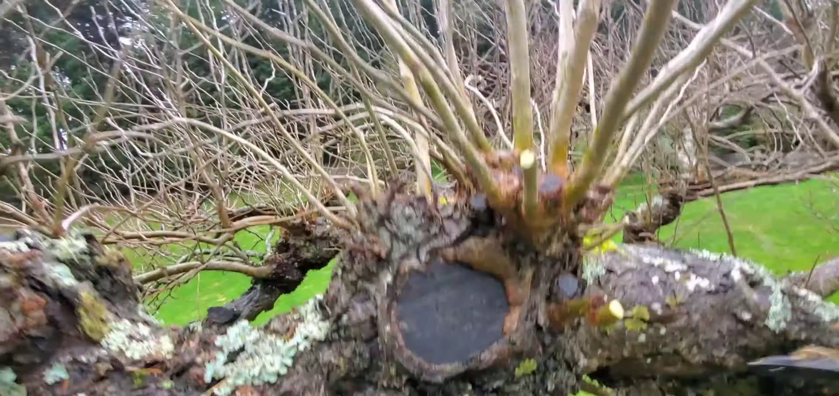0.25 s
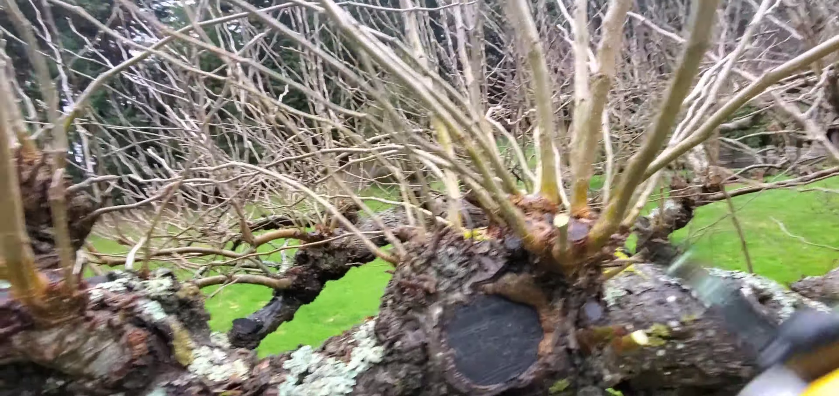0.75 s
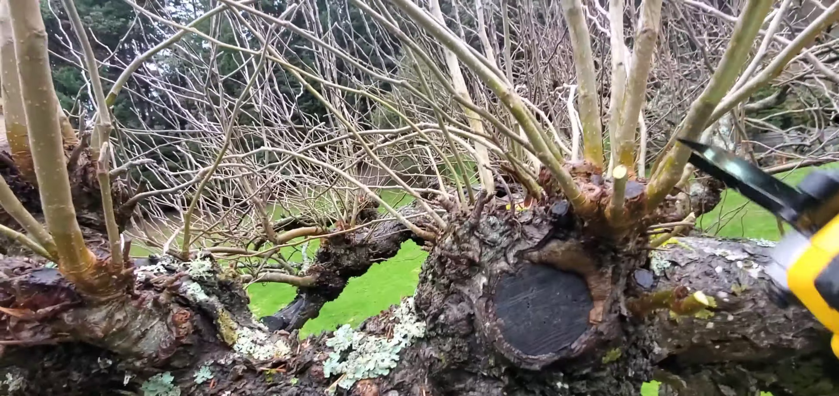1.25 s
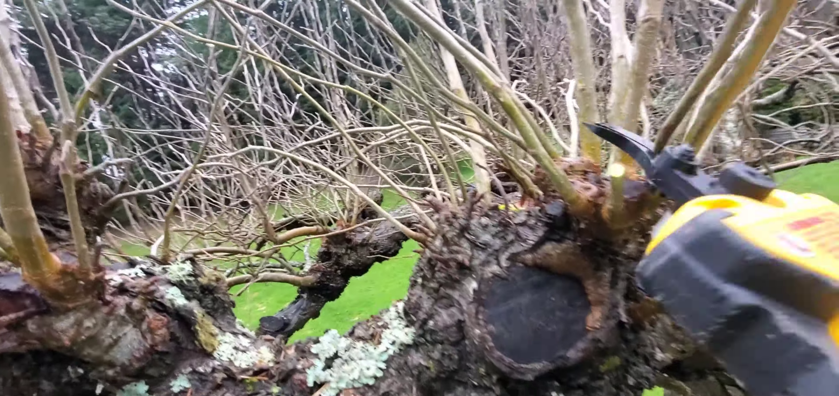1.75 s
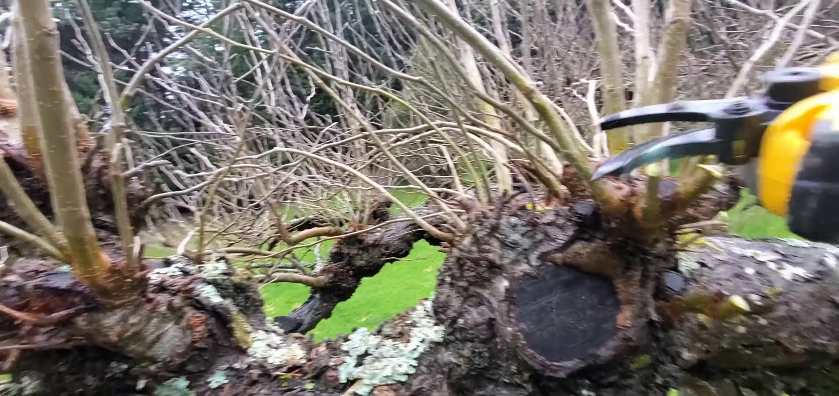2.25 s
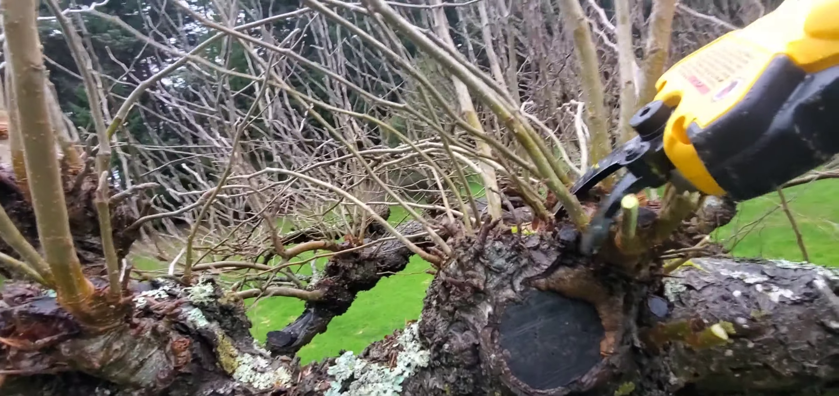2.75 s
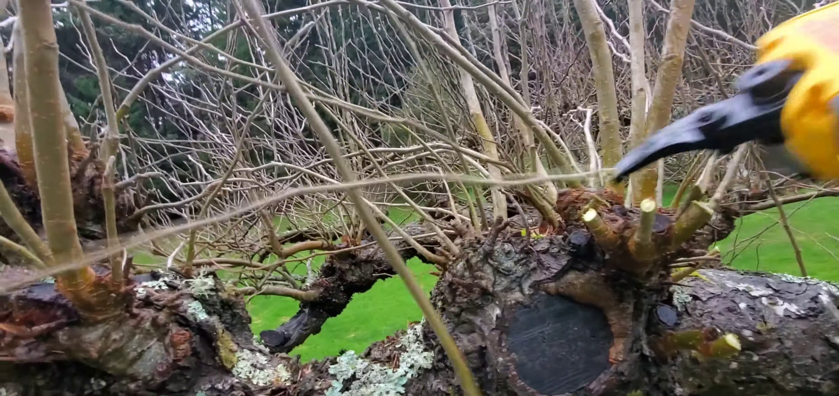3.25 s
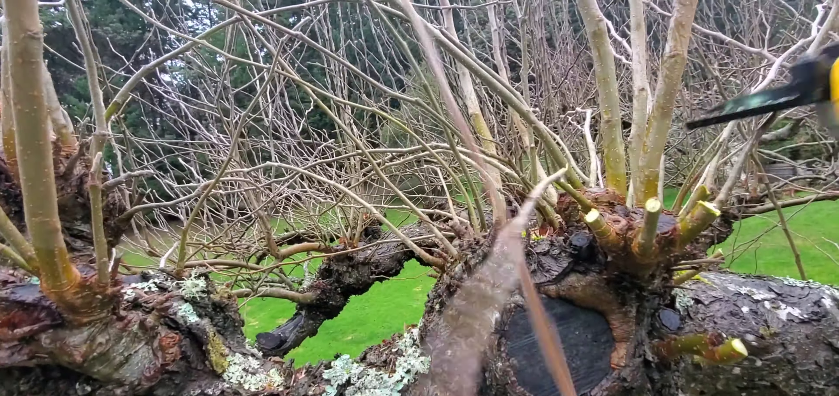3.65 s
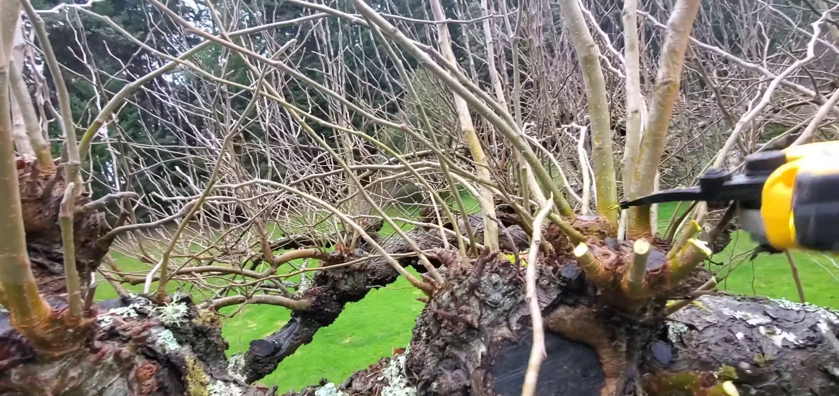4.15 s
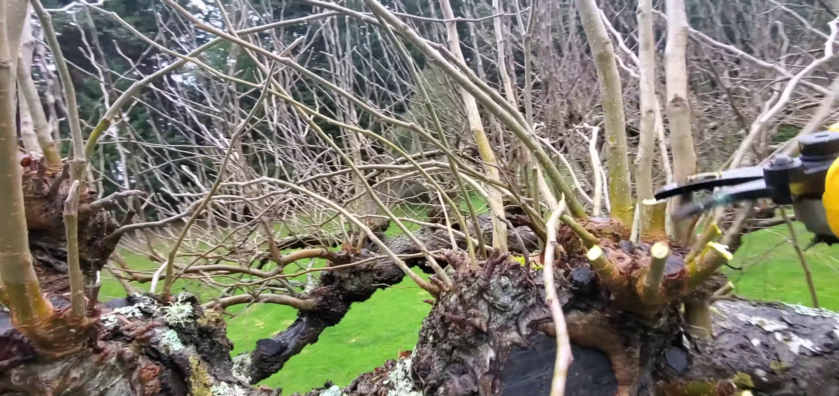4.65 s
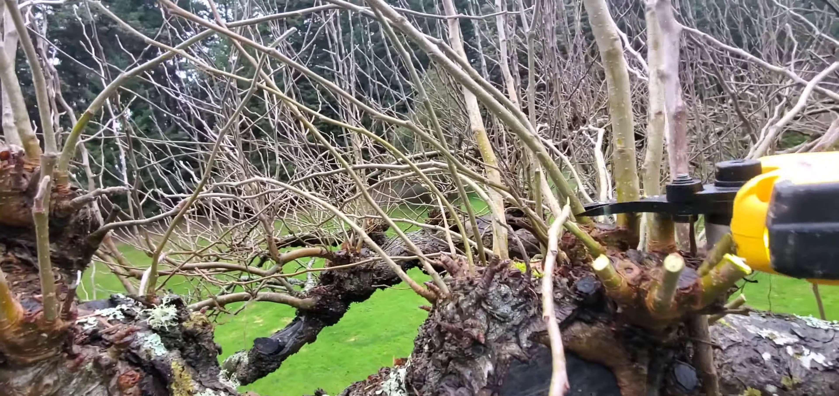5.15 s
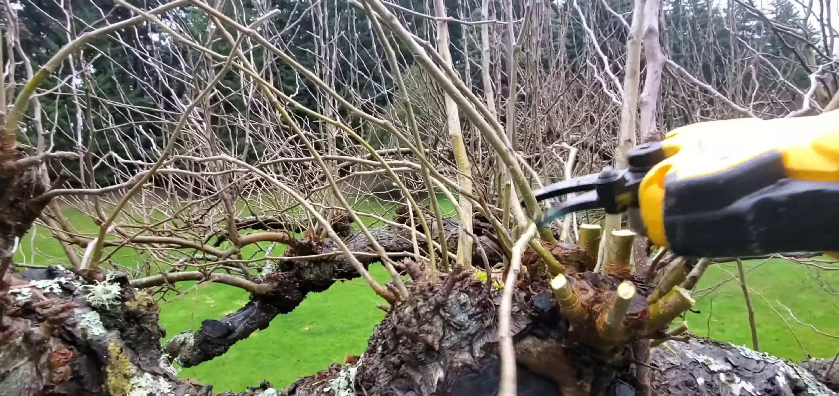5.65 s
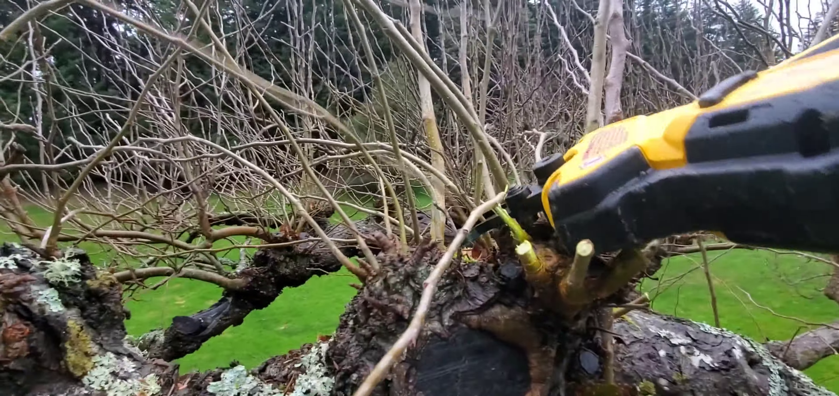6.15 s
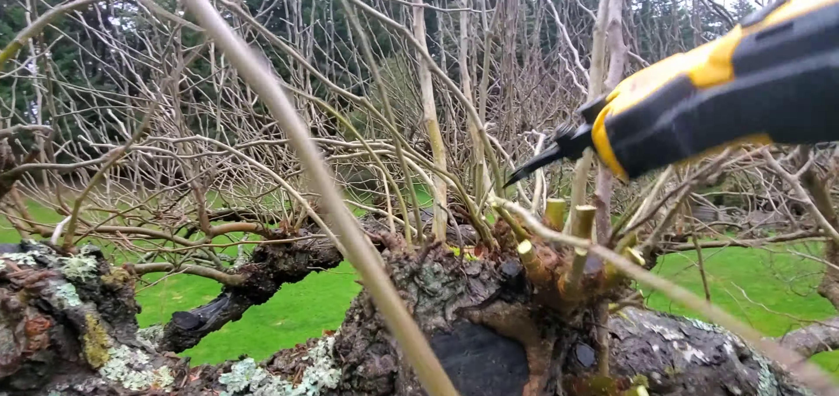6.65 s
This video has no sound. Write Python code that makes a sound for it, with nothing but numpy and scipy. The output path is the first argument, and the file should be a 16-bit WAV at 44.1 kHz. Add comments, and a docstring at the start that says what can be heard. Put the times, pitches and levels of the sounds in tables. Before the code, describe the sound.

Outdoors, low wind thumps hit the left microphone at 0-0.3 s, then both sides strongly from 0.5 to 1 s, over thin leaf hiss and a few faint ticks. At 1.64 s battery pruning shears start on the right: a gritty motor and gear whir with a quick upward whoop strains shut for about 0.27 s, knocks around 1.87 s, then a lighter, lower whir reopens them at 2.0-2.35 s, ending in a hard clack. The close-and-reopen pair repeats at 2.8 and 3.3, 4.05 and 4.5, 5.1 and 5.5, and 6.15 and 6.55 s, with sharp knocks, strongest near 3.06 and 5.32 s. Dry twig ticks cluster around 3.2 and 5.9 s; dull handling bumps come near 1.4, 3.8 and 6.0 s. A barely audible hum swells at 4.3 s. Wind rumbles unevenly to the end, with the tool duller on the left.

```python
"""Wind thumps on the left microphone port, then on both, in an orchard; battery pruning shears follow on the right.
They close and reopen five times: motor and gears whir from noise repeated partly on each turn plus shaft tones,
whoops glide as the speed changes, and decaying modes with bursts of noise make the knocks and a twig's snap.
The left port, farther off, hears the tool about half a millisecond later and duller. Around it come short ticks,
dull bumps, a faint two-tone hum and the hiss of leaves; wind is shaped noise with levels of its own on each port."""
import sys
import numpy as np
from scipy import signal
from scipy.fft import rfft, irfft, next_fast_len
from scipy.io import wavfile
from scipy.ndimage import uniform_filter1d, map_coordinates

SR = 44100
rng = np.random.default_rng(int(sys.argv[2]) if len(sys.argv) > 2 else 0)


def to_wav(s):
    """Save 16-bit WAV."""
    ch = np.atleast_2d(s).T  # columns
    pcm = np.round(np.clip(ch, -1, 1) * 32767)  # PCM
    wavfile.write(sys.argv[1], SR, pcm.astype(np.int16))


N = 305083
T = np.arange(N) / SR

# "rel. dB" is a level within its own layer, which trims, filters or random wavering shift further.
# Closing strokes, loaded: (start [s], length [s], gear noise at the bite [rel. dB], as it cuts through [rel. dB],
# treble against it [rel. dB], top speed after [s], climb [Hz/s], loaded shaft [Hz], hum [rel. dB],
# whine at top speed [rel. dB], whine under load [rel. dB], spin-up whoop [dB], braking whoop [dB])
CLOSING_STROKES = [(1.644, .27, -26, -23.5, -15, 0.16, 380, 311, -31.5, -37, -35, -24, -35),
                   (2.82, 0.27, -28, -23, -16, 0.12, 1030, 339.5, -32.5, -60, -47, -19.5, -21.5),
                   (4.044, .28, -24, -21.5, -16.5, 0.13, 990, 331.4, -38, -57, -48, -20.5, -31),
                   (5.083, .265, -27.5, -24, -16, .136, 860, 333, -35, -49, -48, -25.5, -24.5),
                   (6.139, 0.27, -26.5, -25.5, -15, .142, 700, 331, -35, -42, -60, -18.5, -21.5)]
# Opening strokes, running free: (start [s], gear noise at speed [rel. dB], before the stop [rel. dB],
# treble against it [rel. dB], hum [rel. dB], whine midway [rel. dB], before the stop [rel. dB], spin-up whoop [dB])
OPENING_STROKES = [(2.012, -34, -27, -13, -44, -43.5, -41, -23.5),
                   (3.292, -29.5, -29.5, -15, -47, -45, -53, -23.5),
                   (4.488, -34, -31.5, -16, -49.5, -48, -49, -27),
                   (5.48, -32.5, -28, -17, -49.5, -50, -49.5, -28),
                   (6.57, -31.5, -32.5, -17, -57, -54, -64, -25.5)]
# Shaft harmonics: (multiple of the turn [-], level against the hum [rel. dB])
CLOSING_ORDERS = [(2, -11.5), (3, 4.5), (4, -7.5)]
OPENING_ORDERS = [(1.5, 1.5), (2, 3.5), (3, -2), (4, 3.5), (5, 2), (7, -1.5), (12, -2.5), (15.15, -1),
                  (16, 0.5), (21, -10)]
# Gear noise through the housing, its treble, and the blade singing: (frequency [Hz], density [rel. dB per Hz])
CLOSING_BODY = [(200, -11.5), (500, -2.5), (900, 0.5), (1400, 1.5), (1950, -2.5), (2500, -14.5),
                (3300, -10.5), (4400, -12.5), (5200, -16), (5900, -15), (6600, -33)]
OPENING_BODY = [(200, -9), (500, -2.5), (900, -3), (1500, 1), (2000, -8), (2600, -13), (3700, -11),
                (4500, -13), (5200, -18.5), (5900, -18.5), (6500, -42.5)]
GEAR_TREBLE = [(6500, -10), (7600, -20.5), (8600, -8), (10000, -5.5), (11000, -1.5), (12500, -6.5),
               (14000, -5.5), (15500, -4)]
BLADE_COLOUR = [(2950, -8), (3200, -4.5), (3500, -7)]
# Knocks on the tool, some with a faint lighter tap just before, and a twig's snap:
# (time [s], level [rel. dB], low thud [rel. dB], edge crack [rel. dB])
KNOCKS = [(1.6457, -26, 11.5, -26), (1.8633, -13, -9, -12), (1.8809, -9, -31, -28), (1.8931, -14, 1, -15),
          (1.9948, -26.5, -5, -30), (2.0428, -19.5, 0, -24), (2.3226, -9.5, -4, -23), (2.331, -21, 6, -20),
          (2.8172, -35, 6, -24), (3.0591, -8, -1.5, -20), (3.283, -32, 0, -18), (3.2939, -17.5, -17, -32),
          (3.6027, -16.5, -2.5, -14.5), (3.937, -26, -20, -14), (3.9409, -15, -29, -12),
          (4.0439, -24.5, -6, -30), (4.2939, -9.5, -25, -24), (4.4876, -26.5, 3, -36),
          (4.522, -21.5, -3, -31), (4.796, -13.5, -3, -19), (5.0841, -30, -2, -27), (5.3192, -5.5, 0, -15),
          (5.3284, -12.5, -18, -29), (5.477, -36, 6, -34), (5.4877, -32, 17.5, -33), (5.7891, -16, -4, -18),
          (6.136, -32, 4, -20), (6.1439, -28, 6, -14), (6.3818, -15.5, 3, -35), (6.5715, -26, 5.5, -16),
          (6.5979, -24.5, 8, -23), (6.8788, -18, 3.5, -18)]
# Ringing of the tool and its thud: (nominal frequency [Hz], level [rel. dB], 60 dB decay [s])
TOOL_MODES = [(1460, -3, .022), (1748, 5, 0.024), (1991, 4, 0.024), (2690, -9, 0.03), (3590, -2.5, 0.03),
              (4420, -16, 0.024), (6080, -23, 0.03)]
THUD_MODES = [(564, 0.5, 0.054), (842, -1.1, 0.062)]
# Bright crack of the blade's edge: (frequency [Hz], density [rel. dB per Hz])
CRACK_COLOUR = [(2500, -8), (3600, -1), (4300, 0), (5600, -3), (7600, -14), (9000, -7), (11000, -2.5),
                (15500, -7)]
# Delay of the tool at the far port: (time [s], lag [samples])
FAR_LAG = [(1.6, 17), (2.1, 21), (3.3, 23), (4.1, 24), (5.8, 24), (6.2, 21)]
# Duller tool at the far port: (frequency [Hz], gain [dB])
FAR_SHADOW = [(200, -4), (400, -1.5), (1300, -4.5), (2400, -5.5), (4400, -7), (8000, -18), (15000, -13.5)]
# Twigs and fingers tick: (time [s], level [rel. dB], left minus right [dB])
TICKS = [(0.236, -30.5, 17), (0.3554, -37, -9), (1.4124, -38, -5.0), (1.578, -39, -17), (1.984, -33, -17),
         (2.41, -39, -21), (2.605, -42, -10.5), (2.6678, -37, -16.5), (2.798, -43, -12), (3.1483, -32, -9),
         (3.1986, -35, -17), (3.222, -37.5, -13.5), (3.2337, -28.5, -15), (3.2654, -29, -20),
         (3.69, -39.5, -15), (3.784, -39, -13), (3.9175, -40, -14), (4.0275, -39, -12),
         (4.4308, -35.5, -12), (4.4608, -38, -24), (5.4146, -46, -14), (5.4365, -46, -14),
         (5.45, -37.5, -14), (5.9, -44, -10), (5.9199, -34, -10), (5.9376, -32.5, -14), (6.036, -34, -12),
         (6.0576, -42, -13), (6.119, -34, -17), (6.5204, -32, -13), (6.548, -31, -15)]
# Tick spectrum: (frequency [Hz], density [rel. dB per Hz])
TWIG_COLOUR = [(1200, 9), (2200, 9), (4500, 2), (7000, -9), (10000, -5), (15000, -9)]
# Dull bumps on the microphone case: (time [s], level [rel. dB], frequency [Hz], left minus right [dB])
BUMPS = [(1.401, -32, 421, -12), (3.815, -37.5, 385, -10), (3.838, -43, 428, -7), (6.018, -36, 480, -5),
         (6.03, -28, 402, -5)]
# Wind buffets on the ports: (peak time [s], left [rel. dB], right [rel. dB], 20 dB fall [s],
# flutter against the rumble [rel. dB])
BUFFETS = [(0.06, -17.5, -62, 0.1, -18), (0.13, -24, -60, 0.05, -20), (0.195, -17, -61, 0.11, -22),
           (0.5, -30, -32, 0.08, -6), (0.584, -20.5, -25.5, 0.08, -8.5), (0.663, -15, -15, 0.06, -13.5),
           (0.777, -19, -18, 0.1, -10), (0.86, -24, -26, 0.05, -9.5), (0.923, -17.5, -20, 0.13, -6.5),
           (1.187, -28.5, -36, 0.1, -23), (1.442, -24.5, -45, 0.12, -8), (1.55, -29, -31, 0.2, -4),
           (1.621, -32, -32.5, 0.2, -9), (1.846, -15, -19, 0.17, -12), (1.936, -25, -25.5, 0.17, -8),
           (2.065, -25.5, -27, 0.35, -7.5), (2.325, -24, -24.5, 0.199, -13), (2.544, -31, -33, 0.079, -15),
           (2.624, -34, -33.5, 0.148, -16), (2.814, -32.5, -33, 0.03, -14), (2.963, -31, -32, 0.126, -13),
           (3.228, -41.5, -47, 0.16, -11), (3.485, -24, -21, 0.07, -15), (3.527, -23.5, -21, 0.13, -13),
           (3.766, -32.5, -31, 0.05, -15), (4.071, -24, -24, 0.096, -10.5), (4.225, -28.5, -28, 0.2, -16),
           (4.704, -34.5, -32, 0.38, -13), (4.874, -35, -36, 0.107, -17), (5.073, -44, -37.5, 0.1, -8),
           (5.493, -30, -35, 0.14, -12), (5.607, -30, -26, 0.23, -8), (5.685, -28, -28, 0.08, -10),
           (5.777, -23.5, -24, 0.15, -8), (5.941, -32, -33, 0.1, -10), (6.051, -29.5, -57, 0.076, -7),
           (6.196, -32, -33.5, 0.151, -14), (6.326, -32, -38, 0.14, -8), (6.485, -28, -29, 0.28, -14),
           (6.815, -32.5, -34, 0.085, -13)]
# Breeze between the buffets: (time [s], rumble [rel. dB], flutter [rel. dB])
BREEZE = [(0, -36, -48), (.3, -40, -44), (.5, -35.5, -36), (.85, -32, -35), (1.05, -42, -28.5),
          (1.07, -48, -46), (1.35, -46, -55), (2.2, -30.5, -46), (2.75, -54, -53), (3.1, -49, -41),
          (3.45, -55, -46), (3.5, -32, -42), (3.95, -44, -52), (4.15, -30, -47), (4.32, -57, -43),
          (4.42, -43, -40.5), (5.0, -51, -55), (5.43, -58.5, -51), (5.7, -29, -37), (5.88, -46, -56),
          (6.11, -45, -59), (6.4, -35, -40.5), (6.92, -53, -47)]
# Spectra of rumble and flutter: (frequency [Hz], density [rel. dB per Hz])
RUMBLE_COLOUR = [(18, -28), (35, -6), (55, -3.5), (75, 0), (110, -4.5), (160, -10), (250, -16.5),
                 (500, -44)]
FLUTTER_COLOUR = [(130, -22), (260, 1.5), (400, 3.5), (650, -8.5), (1200, -24), (3000, -36.5),
                  (8000, -60.5)]
# Leaves and distance: (frequency [Hz], density [rel. dB per Hz])
ORCHARD_COLOUR = [(350, -34), (600, -0.5), (1100, -7), (1280, -8.5), (1410, -7.5), (2610, -15.5),
                  (4280, -22.5), (16000, -40)]
# Orchard hiss: (time [s], level [rel. dB])
ORCHARD_LEVEL = [(0, -52.5), (.23, -51), (.25, -47), (1.05, -49), (1.08, -55), (6.92, -51.5)]

# stroke timing: up to speed, to the wood, braking before the end, dying away after it
SPIN_UP_S, BITE_S, BRAKE_S, COAST_S = 0.052, 0.15, 0.035, 0.052
OPENING_S, TONES_AFTER_S = 0.3328, 0.058
# closing gear noise, rel. dB: at the start, at speed, braked, stopped
CATCH_DB, RUN_DB, BRAKE_DB, STOP_DB = -35.5, -29, -30.5, -59
# opening gear noise, rel. dB: start against running; braked and stopped against the level before the stop
OPEN_CATCH_DB, OPEN_BRAKE_DB, OPEN_STOP_DB = 0.5, -1.5, -36
SLOW_TREBLE_DB, BRAKE_TREBLE_DB = -12, -4  # a slow motor is duller
CLOSE_TOP_HZ = 337
OPEN_HZ, OPEN_AT_S = (235, 247, 253), (0.048, 0.17, 0.305)  # the free shaft creeps up
# hum and whine against their levels at speed (opening whine: against midway)
EARLY_HUM_DB, LATE_HUM_DB, EARLY_WHINE_DB, OPEN_EARLY_WHINE_DB = -10.5, -3, -3, -16
# whoops: (middle Hz, glide Hz either side, middle in s after the start or end of the stroke)
CLOSE_WHOOP, OPEN_WHOOP, BRAKE_WHOOP = (540, 230, 0.036), (590, 110, 0.033), (560, -230, -0.0031)
WHOOP_S = 0.044
BUFFET_RISE = 0.55  # rise time as a share of the fall


def closing_plan():
    """Levels, shaft and whoops of the closing strokes: spin up, strain through the wood, brake."""
    levels, shafts, tones = [], [], []
    for (s, length, bite_db, cut_db, treble_db, top_s, climb, load_hz, hum_db,
         whine_db, load_db, up_db, brake_db) in CLOSING_STROKES:
        end = s + length
        slow_db = treble_db + SLOW_TREBLE_DB
        levels.append([
            (s, CATCH_DB, slow_db),
            (s + SPIN_UP_S, RUN_DB, treble_db),
            (s + BITE_S, bite_db, treble_db),
            (end - BRAKE_S, cut_db, treble_db),
            (end, BRAKE_DB, treble_db + BRAKE_TREBLE_DB),
            (end + COAST_S, STOP_DB, slow_db)])
        early_hz = CLOSE_TOP_HZ - climb * (top_s - TONES_AFTER_S)
        shafts.append([
            (s + TONES_AFTER_S, early_hz, hum_db + EARLY_HUM_DB, whine_db + EARLY_WHINE_DB),
            (s + top_s, CLOSE_TOP_HZ, hum_db, whine_db),
            (end - 0.03, load_hz, hum_db + LATE_HUM_DB, load_db)])
        tones += [(s, CLOSE_WHOOP, up_db), (end, BRAKE_WHOOP, brake_db)]
    return levels, shafts, tones


def opening_plan():
    """The same for the opening strokes: a free run of fixed length up to the stop."""
    levels, shafts, tones = [], [], []
    for s, run_db, late_db, treble_db, hum_db, whine_db, last_db, up_db in OPENING_STROKES:
        end = s + OPENING_S
        slow_db = treble_db + SLOW_TREBLE_DB
        levels.append([
            (s, run_db + OPEN_CATCH_DB, slow_db),
            (s + SPIN_UP_S, run_db, treble_db),
            (end - BRAKE_S, late_db, treble_db),
            (end, late_db + OPEN_BRAKE_DB, treble_db + BRAKE_TREBLE_DB),
            (end + COAST_S, late_db + OPEN_STOP_DB, slow_db)])
        whines = (whine_db + OPEN_EARLY_WHINE_DB, whine_db, last_db)
        shafts.append([(s + at, hz, hum_db, db) for at, hz, db in zip(OPEN_AT_S, OPEN_HZ, whines)])
        tones.append((s, OPEN_WHOOP, up_db))
    return levels, shafts, tones


def motor_strokes(levels, shafts, body, orders, whine, repeat, gain_db, throb, fast_db, slow_db, blade_db):
    """The shaft's angle drives both the gear noise and the tones of one set of strokes."""
    rows = np.concatenate(shafts)
    shaft_hz = np.interp(T, rows[:, 0], rows[:, 1]) * (1 + 0.0008 * walk(60))
    turn = 2 * np.pi * np.cumsum(shaft_hz) / SR
    at_speed = uniform_filter1d(track(shafts, axis=0, rest=0) > 0, size=600, output=float)
    # fast and slower random wavering makes the gear noise grainy
    grain = undb(fast_db * walk(900) + slow_db * walk(160)) * (1 + throb * np.cos(turn))
    rattle = rng.standard_normal((2, N)) * grain
    noise = gear_noise(levels, turn, at_speed, rattle, body, repeat, gain_db, blade_db)
    return noise + at_speed * motor_tones(rows, turn, orders, whine)


def gear_noise(levels, turn, at_speed, rattle, body, repeat, gain_db, blade_db):
    """Gear teeth rattle through the housing, partly alike on every turn; the blade sings above them."""
    # worn teeth repeat one uneven pattern each turn
    pattern = irfft(undb(4 * rng.standard_normal(62)) * np.exp(2j * np.pi * rng.random(62)), 2048)
    alike = unit(np.interp(turn % (2 * np.pi), np.linspace(0, 2 * np.pi, 2048), pattern))
    near, other = rattle

    def teeth(apart, share, points):
        """The far port faces another side of the housing, so part of its rattle is its own."""
        far = np.sqrt(1 - apart ** 2) * near + apart * other
        mixes = [share * alike + np.sqrt(1 - share ** 2) * unit(side) for side in (far, near)]
        return np.array([unit(colour(mix, points)) for mix in mixes])

    # the motor takes a few milliseconds to catch
    amplitude = uniform_filter1d(undb(track(levels, axis=1, rest=-120) + gain_db), size=300)
    db = 20 * np.log10(amplitude.clip(1e-6))
    treble_db = db + track(levels, axis=2, rest=0)
    # the blade grows twice as fast as the load, in dB
    blade = undb(2 * db + blade_db + 3.1 * walk(40)) * teeth(1.0, 0, BLADE_COLOUR)
    gears = undb(db + 0.83 * walk(45)) * teeth(0.75, repeat[0] * at_speed, body)
    hiss = undb(treble_db + 2.2 * walk(35)) * teeth(1.0, repeat[1] * at_speed, GEAR_TREBLE)
    return gears + hiss + blade


def motor_tones(rows, turn, orders, whine):
    """The shaft hums on multiples of its turn and whines on a high one."""
    harmonics = sum(undb(db + 2.7 * walk(25)) * np.sin(k * turn) for k, db in orders)
    shaft_hum = undb(np.interp(T, rows[:, 0], rows[:, 2]) + 2.5) * (np.sin(turn) + harmonics)
    whine_db = np.interp(T, rows[:, 0], rows[:, 3]) + 9.0 + 2.3 * walk(30)
    return shaft_hum + undb(whine_db) * np.sin(whine * turn)


def whoops(tones):
    """A short gliding tone as the speed sweeps through the housing resonance."""
    out, t = np.zeros(N), np.linspace(-1, 1, int(WHOOP_S * SR))
    for s, (hz, glide, after), db in tones:
        tone = np.sin(2 * np.pi * np.cumsum(hz + glide * t) / SR)
        add(out, s + after - len(t) / 2 / SR, undb(db) * np.hanning(len(t)) * tone)
    return out


def knocks():
    """Each knock rings decaying modes, with a thud, a snap of noise and a bright crack."""
    out, snaps, cracks, t = np.zeros(N), np.zeros(N), np.zeros(N), np.arange(2600) / SR
    rise = 1 - np.exp(-t / 0.00033)
    for s, db, thud_db, crack_db in KNOCKS:
        chance = rng.standard_normal(2608)
        noise = chance[8:]
        tool = ring(TOOL_MODES, t, chance[:7])
        thud = ring(THUD_MODES, t, chance[:2])
        blow = tool / np.abs(tool * rise).max() + undb(thud_db - 6.0) * thud
        add(out, s - 0.0005, undb(db + 0.7) * rise * blow)
        add(snaps, s - 0.0005, undb(db) * rise * noise * np.exp(-t / 0.0046))
        add(cracks, s, undb(db + crack_db + 3.5) * rise * noise * np.exp(-t / 0.0026))
    return out + colour(snaps, CLOSING_BODY) * undb(10) + colour(cracks, CRACK_COLOUR) * undb(9.0)


def ring(modes, t, chance):
    """Decaying modes, a little detuned and reweighted on each knock."""
    out = np.zeros(len(t))
    for (hz, db, t60), weight, detune in zip(modes, chance, chance[::-1]):
        tone = np.sin(2 * np.pi * hz * (1 + 0.033 * detune) * t)
        out += undb(db + 2.0 * weight) * tone * np.exp(-np.log(1000) * t / t60)
    return out


def at_the_ports(far, near):
    """The extra distance delays the tool at the far (left) port, and shadowing dulls it."""
    lag = np.interp(T, *np.transpose(FAR_LAG))
    late = map_coordinates(far, [np.arange(N) - lag], order=3)
    shadow = FAR_SHADOW + [(SR / 2, FAR_SHADOW[-1][1])]  # level up to the top of the band
    return np.array([colour(late, shadow), near])


def ticks():
    """Twigs and fingers tick: noise bursts that die away in milliseconds, mostly alike on both ports."""
    out, t = np.zeros((2, N)), np.arange(900) / SR
    envelope = np.exp(-t / 0.0067) * (1 - np.exp(-t / 0.00051))
    for s, db, pan_db in TICKS:
        noise = rng.standard_normal((2, 900))
        burst = (noise.sum(0) + 0.38 * noise) * envelope
        add(out, s, port_gains(db, pan_db) * burst / np.abs(burst).max())
    return undb(-8.5) * np.array([colour(port, TWIG_COLOUR) for port in out])


def bumps():
    """A few soft cycles of the microphone case, swelling and dying away."""
    out, t = np.zeros((2, N)), np.arange(1800) / SR
    for s, db, hz, pan_db in BUMPS:
        cycles = np.sin(2 * np.pi * hz * t) * t / 0.0027 * np.exp(1 - t / 0.0038)
        add(out, s, port_gains(db, pan_db) * cycles)
    return out


def faint_hum():
    """Two soft steady tones swell and fade together."""
    start, end = 4.26, 4.45  # s
    swell = np.sin(np.pi * np.clip((T - start) / (end - start), 0, 1))
    low = undb(-36) * np.sin(2 * np.pi * 281 * T)
    high = undb(-43) * np.sin(2 * np.pi * 376 * T)
    return swell * (low + high)


def air():
    """Wind rumble and flutter on the ports over the orchard's quiet hiss."""
    eddies = np.array([walk(30), walk(30)])
    rumble_db, flutter_db = wind_levels()
    rumble = gusts(rumble_db + 0.7, RUMBLE_COLOUR, 2.8 * eddies, alike=0.7)
    # air tearing round the case flutters higher up
    flutter = gusts(flutter_db - 2.2, FLUTTER_COLOUR, 3.36 * eddies + 3.2 * walk(60), alike=0.11)
    hiss_db = np.interp(T, *np.transpose(ORCHARD_LEVEL)) + np.array([[-1.2], [1.2]])
    hiss = gusts(hiss_db, ORCHARD_COLOUR, [1.6 * walk(30)] * 2, alike=0.12)
    return rumble + flutter + hiss


def wind_levels():
    """Rumble and flutter levels (dB) on each port: the breeze with the buffets' power on top."""
    s, rumble_db, flutter_db = np.transpose(BREEZE)
    t = T[::64]  # a coarse clock is enough for levels
    rumble, flutter = (np.tile(undb(2 * np.interp(t, s, db)), (2, 1)) for db in (rumble_db, flutter_db))
    for peak, left_db, right_db, fall, tear_db in BUFFETS:
        drop_db = 20 * np.maximum((t - peak) / fall, (peak - t) / fall / BUFFET_RISE)
        power = undb(2 * (np.array([[left_db], [right_db]]) - drop_db))
        rumble += power
        flutter += power * undb(2 * tear_db)
    return [np.array([np.interp(T, t, 10 * np.log10(port)) for port in x]) for x in (rumble, flutter)]


def gusts(level_db, points, lumps_db, alike):
    """Turbulent noise in lumps, a level for each port; eddies push one port as they pull the other."""
    shared = rng.standard_normal(N)
    ports = []
    for sign, lumps in zip((1, -1), lumps_db):
        noise = alike * sign * shared + rng.standard_normal(N)
        ports.append(unit(colour(noise, points) * undb(lumps)))
    return np.array(ports) * undb(level_db)


def undb(db):
    """Decibels to an amplitude factor."""
    return 10 ** (np.asarray(db) / 20)


def unit(x):
    """Scale to an RMS of one."""
    return x / np.sqrt(np.mean(x ** 2))


def colour(x, points):
    """Shape a spectrum by (frequency [Hz], level [dB]) points, falling away outside them."""
    hz, db = np.transpose(points)
    size = next_fast_len(N)
    f = np.log(np.fft.rfftfreq(size, 1 / SR) + 1)
    slope = -40 * (np.maximum(np.log(hz[0]) - f, 0) + np.maximum(f - np.log(hz[-1]), 0))
    return irfft(rfft(x, size) * undb(np.interp(f, np.log(hz), db) + slope), size)[:N]


def track(tables, axis, rest):
    """One column of several tables over time, at a rest value between them."""
    out = np.full(N, float(rest))
    for rows in tables:
        s, values = np.array(rows)[:, [0, axis]].T
        inside = (T >= s[0]) & (T <= s[-1])
        out[inside] = np.interp(T[inside], s, values)
    return out


def walk(rate):
    """Random levels, one every 1 / rate s, joined by ramps; RMS of one."""
    k = int(SR / rate)
    steps = np.repeat(rng.standard_normal(N // k + 1), k)
    return unit(uniform_filter1d(steps, k)[:N])


def port_gains(db, pan_db):
    """Left and right gains for a level and a left-minus-right difference."""
    return undb(db + np.array([[pan_db], [-pan_db]]) / 2)


def add(out, s, x):
    """Mix a short sound in at time s."""
    i = int(s * SR)
    out[..., i:i + x.shape[-1]] += x[..., :N - i]


def scene():
    """The shears on the right, heard at both ports, then the small sounds and the air around them."""
    close_levels, close_shafts, close_tones = closing_plan()
    open_levels, open_shafts, open_tones = opening_plan()
    # whine: multiple of the turn; repeat: share of rattle alike each turn, in the body and in the treble
    closing = motor_strokes(close_levels, close_shafts, CLOSING_BODY, CLOSING_ORDERS, whine=12,
                            repeat=(0.4, 0.35), gain_db=2.5, throb=0.15, fast_db=0.5, slow_db=1.0, blade_db=10.5)
    opening = motor_strokes(open_levels, open_shafts, OPENING_BODY, OPENING_ORDERS, whine=24,
                            repeat=(0.58, 0.62), gain_db=2.0, throb=0.12, fast_db=1.5, slow_db=1.07, blade_db=-2)
    far, near = closing + opening + whoops(close_tones + open_tones) + knocks()
    return at_the_ports(far, near) + ticks() + bumps() + faint_hum() + air()


def record(dry):
    """The microphone channel cuts steeply above 15.8 kHz."""
    low_pass = signal.ellip(10, 0.2, 70, 15800, fs=SR, output="sos")
    return signal.sosfilt(low_pass, dry)


dry = scene()
out = record(dry)
to_wav(out)
```